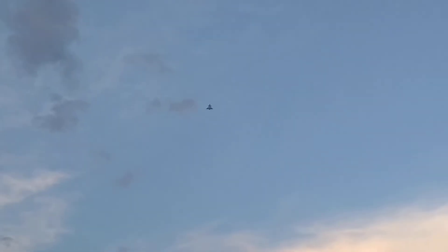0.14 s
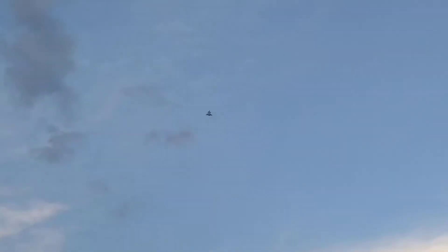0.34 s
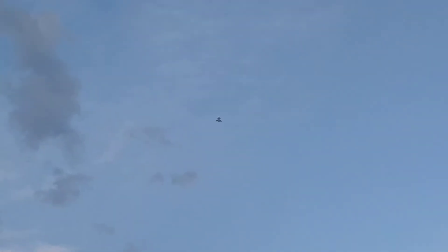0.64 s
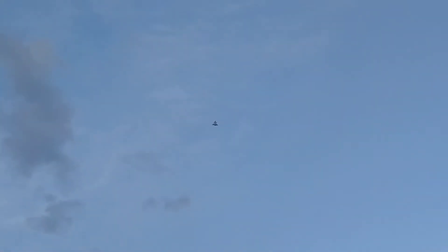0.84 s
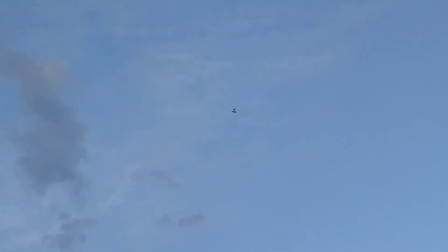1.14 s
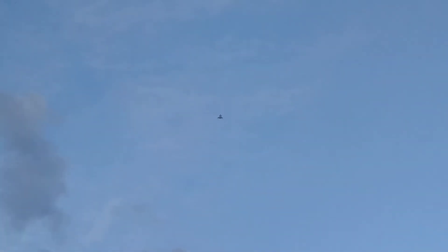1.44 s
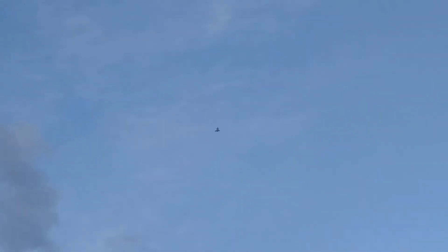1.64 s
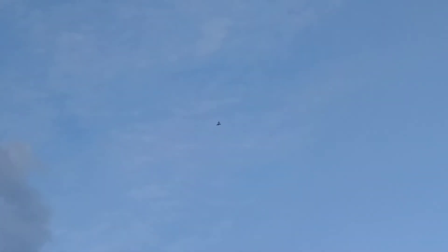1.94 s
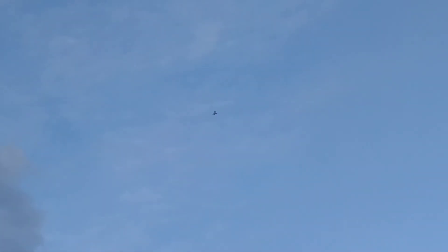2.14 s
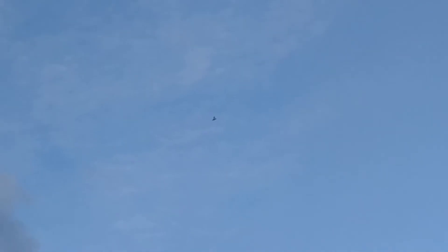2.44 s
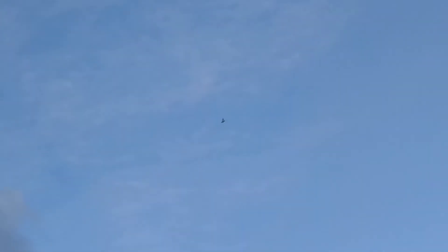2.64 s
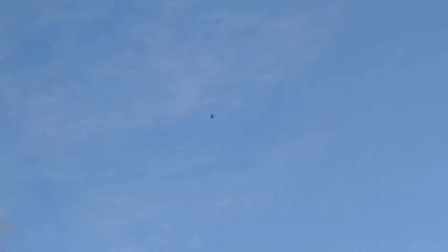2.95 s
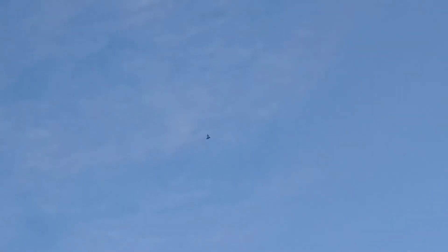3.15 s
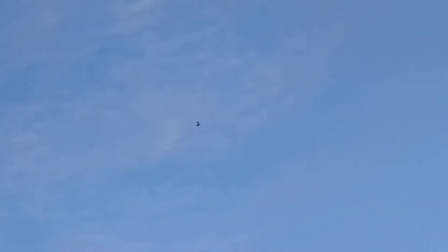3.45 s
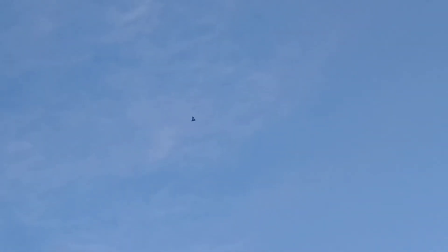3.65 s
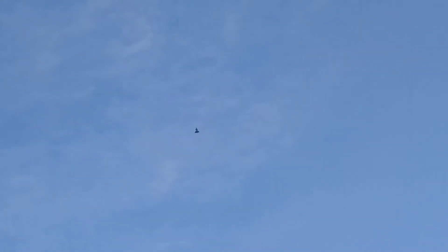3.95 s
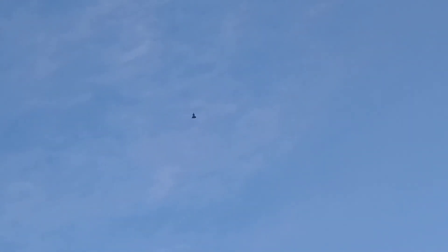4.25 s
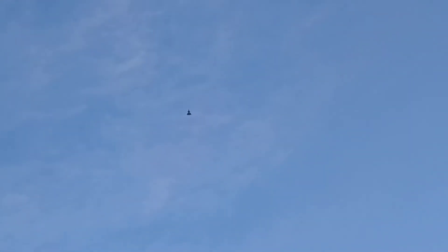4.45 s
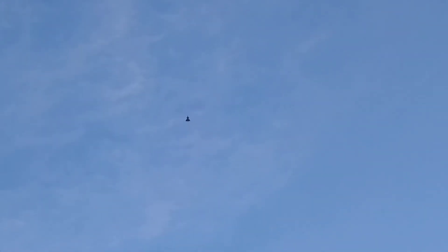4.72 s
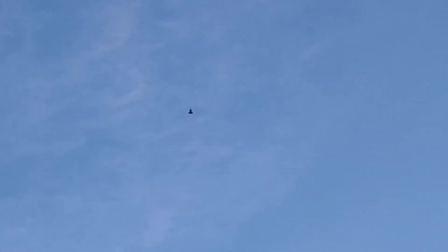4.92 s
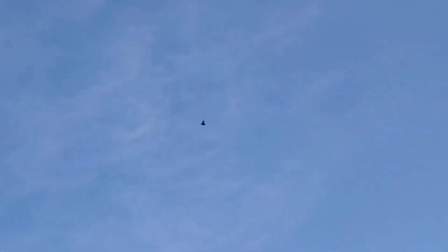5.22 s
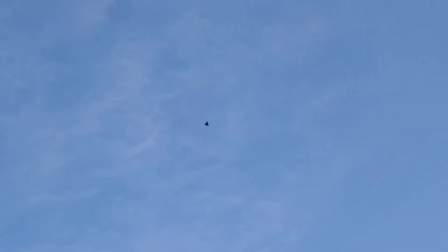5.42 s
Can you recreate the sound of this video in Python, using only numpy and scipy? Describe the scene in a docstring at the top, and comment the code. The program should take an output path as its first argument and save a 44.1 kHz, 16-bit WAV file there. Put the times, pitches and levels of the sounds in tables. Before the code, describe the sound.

A distant model jet holds a continuous electric whine: a clear hum, a fluttering whistle far above it, and rushing, sizzling air. The hum weakens midway, then returns stronger and slightly higher as the jet turns closer. Soft low wind underlies it in an open field, breaking late into three lumpy gusts that buffet the handheld microphone.

```python
"""At first a model jet with an electric ducted fan hums, whistles and hisses high over a field in a light breeze.
It slowly turns toward the listener: its pitch creeps up, then climbs faster, while the treble fades.
Near the end the freshening breeze breaks into three gusts full of eddies that thump on the microphones.
Wind is shaped noise plus short pressure swings, the airflow is four bands of drifting noise,
and the rotor is a set of fluttering sines at multiples of its shaft rate, with noise around the blade pass."""
import sys
import numpy as np
from scipy import signal
from scipy.fft import rfft, irfft, next_fast_len
from scipy.io import wavfile
from scipy.ndimage import uniform_filter1d, map_coordinates

SR = 44100
rng = np.random.default_rng(int(sys.argv[2]) if len(sys.argv) > 2 else 0)


def wrap_up_sound(samples):
    """Save the sound to the file named by the first command line argument, as 16-bit audio."""
    columns = np.atleast_2d(samples).T
    # keep every value between -1 and 1, then stretch to whole-number steps
    tamed = np.clip(columns, -1, 1)
    steps = np.round(tamed * 32767).astype(np.int16)
    wavfile.write(sys.argv[1], SR, steps)


N = 245981


def amp(db):
    """Decibels to gain."""
    return 10 ** (np.asarray(db) / 20)


def unit(x):
    """Scale to rms 1."""
    return x / np.sqrt(np.mean(x ** 2) + 1e-20)


def along(points, hz):
    """Read (frequency [Hz], value) points on a log frequency axis."""
    f, v = np.transpose(points)
    return np.interp(np.log(hz + 1), np.log(f + 1), v)


def curve(points):
    """Read (time [s], value) points at every sample."""
    s, value = np.transpose(points)
    return np.interp(np.arange(N) / SR, s, value)


def wobble(rate):
    """A smooth random curve with rate knots a second."""
    knots = rng.standard_normal(int(N * rate / SR) + 4)
    return map_coordinates(knots, [np.arange(N) * rate / SR])


def swell(s, width_s, db):
    """A bell-shaped rise or dip of level in dB, centred on s."""
    return db * np.exp(-((np.arange(N) / SR - s) / width_s) ** 2)


def filtered(x, response):
    """Shape the spectrum of x with a complex response of frequency."""
    m = next_fast_len(N + SR // 2)
    return irfft(rfft(x, m) * response(np.fft.rfftfreq(m, 1 / SR)), m)[..., :N]


def patches(shape, bin_count, frame_count):
    """A random field of rms 1, smooth over some frequency bins and time frames."""
    field = uniform_filter1d(rng.standard_normal(shape), size=bin_count, axis=0)
    return unit(uniform_filter1d(field, size=frame_count, axis=1))


EDDIES_PER_S, EDDY_HZ = 12, 100  # how many small eddies, and their middle swing rate
EDDY_DB, EDDY_SPREAD_DB = 1, 9  # middle level over the wind, and the reach either side


def small_eddies(wind_db):
    """Rows (time [s], level [dB], rate [Hz]) of eddies at random times, as strong as the wind of the moment."""
    rows = []
    for when, size, pace in rng.uniform(size=(int(EDDIES_PER_S * N / SR), 3)):
        db = wind_db[int(when * N)] + EDDY_DB + EDDY_SPREAD_DB * (2 * size - 1)
        rows.append((when * N / SR, db, EDDY_HZ * 2 ** (pace - .5)))
    return rows


def puffs(eddies, slowing, cycles):
    """Each eddy is one short swing of pressure at its own rate, with a shape of its own."""
    out = np.zeros(N)
    t = np.arange(N) / SR
    for (s, db, hz), shape in zip(eddies, rng.standard_normal(len(eddies))):
        near = np.abs(t - s) < .05
        u = (t[near] - s) * hz / slowing
        out[near] += amp(db) * np.cos(2 * np.pi * u + np.pi * shape) / np.cosh(u / cycles)
    return out


# spectrum of the wind rumble: (frequency [Hz], relative density [dB per Hz])
RUMBLE_SPECTRUM = [(12, -20), (25, -7), (45, 0), (75, 0), (120, -6), (200, -16), (350, -25), (700, -50)]
# lulls and gusts: (time [s], half-width [s], level over the breeze [dB])
LULLS_AND_GUSTS = [(1.1, 0.57, -5.5), (2.5, .3, 2), (4.35, 0.083, 4), (4.85, 0.088, 4), (5.1, .06, -4),
                   (5.46, 0.18, 6.5)]
# the strongest eddies to strike the microphones: (time [s], nominal level [dB], nominal swing rate [Hz])
STRONG_EDDIES = [(3.13, -28, 149), (3.223, -31, 165), (4.026, -29, 100), (4.313, -30, 85),
                 (4.353, -27.5, 50), (4.382, -25, 100), (4.396, -23, 90), (4.409, -25, 142),
                 (4.479, -29, 95), (4.565, -17.5, 165), (4.582, -27, 95), (4.634, -32, 94),
                 (4.651, -26, 135), (4.802, -32, 135), (4.817, -26, 101), (4.835, -22, 85),
                 (4.848, -29, 131), (4.887, -35, 114), (4.939, -24, 121), (4.96, -28, 89), (5.003, -31, 97),
                 (5.168, -34, 80), (5.199, -29, 73.5), (5.287, -29, 89), (5.302, -32, 140),
                 (5.347, -21, 99), (5.362, -28, 118), (5.404, -24.5, 133), (5.43, -29.5, 92),
                 (5.463, -25, 93), (5.479, -25, 135), (5.504, -17, 119), (5.526, -17, 166)]
BREEZE_DB, FRESHEN_DB_PER_S = -51.5, 1.3  # level at the start, and its steady rise


def wind():
    """Lumpy rumble and puffs push the two channels in opposite directions, the left a little earlier."""
    wind_db = BREEZE_DB + FRESHEN_DB_PER_S * np.arange(N) / SR
    wind_db = wind_db + sum(swell(*gust) for gust in LULLS_AND_GUSTS)
    noise = filtered(rng.standard_normal((2, N)), lambda hz: amp(along(RUMBLE_SPECTRUM, hz)))
    lumpy = noise * amp(6.0 * wobble(22.2))
    rumble, stray = amp(wind_db) * unit(lumpy)
    rows = STRONG_EDDIES + small_eddies(wind_db)
    # every eddy has a sharp core inside a slower, weaker swirl
    core = amp(1.5) * puffs(rows, slowing=.95, cycles=.23)
    swirl = amp(-8) * puffs(rows, slowing=1.8, cycles=.4)
    lead_s = .00043

    def ports(hz):
        half_lead = np.exp(1j * np.pi * hz * lead_s)
        return np.array([1.1 * half_lead, -.9 / half_lead])

    # a little stray rumble pushes both channels the same way
    return filtered(rumble + core + swirl, ports) + amp(-19) * stray


# stereo likeness of the airflow noise: (frequency [Hz], left-right likeness [0-1])
LIKENESS = [(300, .39), (700, .82), (1100, 1), (1280, .97), (1600, .45), (1880, .15), (2120, .998),
            (2540, .998), (2700, .6), (3150, 1), (3700, 1), (4250, .45), (4520, .93), (4900, .55),
            (5650, .95), (6600, .75), (7900, .65), (8600, .3), (9300, .65), (10000, .6), (10700, .25),
            (11800, .35), (13200, .9)]


def rush(spectrum, patchy_db):
    """Turbulent stereo noise of rms 1, with drifting patches of gain."""
    z = signal.stft(rng.standard_normal((2, N)), nperseg=512)[2]
    field = patches(z.shape[1:], bin_count=6, frame_count=14)
    pair = signal.istft(z * amp(patchy_db * field), nperseg=512)[1][:, :N]

    def mid_side(hz):
        turn = np.arccos(np.clip(along(LIKENESS, hz), -1, 1)) / 2
        return amp(along(spectrum, hz)) * np.array([np.cos(turn), np.sin(turn)])

    mid, side = filtered(pair, mid_side)
    return unit(np.array([mid + side, mid - side]))


# treble reaching the listener, used as departures from its mean: (time [s], level [dB])
TREBLE_LEVEL = [(0.0, -49.5), (0.11, -53), (0.19, -48), (0.28, -47.5), (0.38, -51), (0.69, -51.5),
                (0.77, -51.5), (1.78, -54.5), (2.9, -54), (3.43, -55), (3.87, -52), (4.02, -54.5),
                (4.3, -56), (5.3, -61), (5.58, -61)]


def air_level(law):
    """A layer's level in dB: it follows the treble by its own share and drifts as the jet turns."""
    mean_db, share, drift_db_per_s = law
    treble_db = curve(TREBLE_LEVEL)
    t = np.arange(N) / SR
    return mean_db + share * (treble_db - treble_db.mean()) + drift_db_per_s * (t - t.mean())


# spectra of the four air layers: (frequency [Hz], relative density [dB per Hz])
ROAR_SPECTRUM = [(25, -4), (50, 3.5), (80, 4.5), (140, 0.5), (225, -4), (325, 2), (400, -.5), (480, 0.5),
                 (700, 0), (860, 2), (1100, -8.5), (1500, -10.5), (2000, -18), (2500, -45), (3200, -27)]
RUSH_SPECTRUM = [(600, -15), (1050, -4.5), (1500, 1.5), (1650, -1), (1850, -5), (2150, -4.5), (2450, -7),
                 (2750, -6), (3250, -3), (3900, -5.5), (4250, -7), (4500, -5), (4850, -6.5), (6000, -19),
                 (9000, -36)]
INTAKE_SPECTRUM = [(3500, -14.5), (4500, -15.5), (4900, -6.5), (5300, -1), (5700, -1.5), (5950, -1),
                   (6400, 0), (6800, 0), (7200, -2.5), (8200, -9), (10000, -43)]
SIZZLE_SPECTRUM = [(6000, -5.5), (8200, -2), (8800, 1.5), (9300, 4), (9900, -2.5), (10600, -5.5),
                   (11500, -3.5), (12300, -3), (13000, -9), (13400, -2), (14200, -31)]
# base level of each layer: (mean level [dB], share of treble [dB per dB], drift [dB per s])
ROAR_LEVEL = (-50, 0.06, 0.064)
RUSH_LEVEL = (-55, 0.42, -0.83)
HISS_LEVEL = (-56, 1.24, 0)
SIZZLE_LEVEL = (-60.5, 0.96, -0.092)


def airflow():
    """The exhaust roars low and rushes in the middle; the intake hisses high with a fluttering level."""
    flutter_db = 0.66 * wobble(25.11) + .3 * wobble(9)
    # the roar swells as the exhaust points at the listener
    roar_db = air_level(ROAR_LEVEL) + swell(s=1.885, width_s=0.27, db=2.3) + 0.61 * wobble(8)
    # the rush sags just before the jet turns in
    rush_db = air_level(RUSH_LEVEL) + swell(s=2.45, width_s=0.24, db=-1.7) + flutter_db
    hiss_db = air_level(HISS_LEVEL) + flutter_db
    # the hiss brightens in its first swell
    sizzle_db = air_level(SIZZLE_LEVEL) + swell(s=0.25, width_s=0.18, db=2.5)
    sizzle_db = sizzle_db + flutter_db + 0.24 * wobble(11)
    exhaust = amp(roar_db) * rush(ROAR_SPECTRUM, patchy_db=1.0)
    exhaust = exhaust + amp(rush_db) * rush(RUSH_SPECTRUM, patchy_db=1.5)
    hiss = amp(hiss_db) * rush(INTAKE_SPECTRUM, patchy_db=1.5)
    sizzle = amp(sizzle_db) * rush(SIZZLE_SPECTRUM, patchy_db=1.0)
    return exhaust + hiss + sizzle


# phase between the ports, opposed in much of the treble: (frequency [Hz], lead of the left [rad])
PORT_PHASE = [(1800, 0), (1970, 1.9), (2120, 3.05), (2350, 3.14), (2540, 3.08), (2680, 1.4), (2850, .3),
              (3100, 0), (3950, .1), (4200, .8), (4430, 3.3), (4950, 5), (5250, 6.1), (6150, 6.8),
              (6300, 6.6), (6460, 4.5), (7000, 4.8), (7700, 6.2), (8300, 6.8), (8900, 9.5), (9600, 11.7),
              (10300, 12.8), (11100, 15.7), (12000, 18.5), (12450, 19.1), (13200, 22), (13700, 22.1),
              (13950, 25.1)]
# level between the ports: (frequency [Hz], left minus right [dB])
PORT_LEAN = [(350, -2.5), (1100, -.5), (1600, -1.5), (2000, 1), (2150, 0), (3900, 0), (4370, 2.5),
             (4650, 0), (5100, -3), (5800, 0), (6450, 9), (6600, 6), (6780, 0), (7250, -3), (8100, 0),
             (8700, 4), (10000, .5), (12200, .5), (12900, 3), (13300, 0)]


def microphones(x):
    """The two ports hear the distant jet with their own phase and level at each frequency."""
    def response(hz):
        lean = amp(along(PORT_LEAN, hz))
        lead = np.exp(.5j * along(PORT_PHASE, hz))
        return np.array([lean * lead, 1 / lead]) / np.sqrt((1 + lean ** 2) / 2)
    return filtered(x, response)


WAVER_RAD, WAVER_SETTLE_DB_PER_S = 0.8, 3.2  # how far the phase strays at first, and how it settles


def waver(pair):
    """Where the two ports nearly cancel, their phase strays, so the notches in the hiss shift and fill."""
    hz, s, z = signal.stft(pair, SR, nperseg=512)
    opposed = np.sin(along(PORT_PHASE, hz) / 2) ** 4
    reach = WAVER_RAD * amp(-WAVER_SETTLE_DB_PER_S * s) * opposed[:, None]
    stray = reach * patches(z.shape[1:], bin_count=3, frame_count=12)
    turned = z * np.exp(.5j * np.array([stray, -stray]))
    return signal.istft(turned, SR, nperseg=512)[1][:, :N]


def partial(angle, twinkle_db, smear, rate):
    """A tone of rms 1 whose level and phase flutter on the way through moving air."""
    return unit(amp(twinkle_db * wobble(rate)) * np.sin(angle + smear * wobble(rate)))


# an overtone swells or drops out as a lobe or gap of its beam sweeps past:
# (multiple of the shaft rate, time [s], half-width [s], level change [dB])
BEAM_LOBES = [(2, 0.39, 0.18, 8), (2, 0.85, 0.13, -9), (2, 1.2, 0.36, 2.5), (2, 3.7, 0.23, -11),
              (2, 4.81, 0.16, -15), (2, 5.53, 0.33, 8.5), (3, 1.3, 0.39, 6), (3, 3.49, 0.29, 11.5),
              (3, 4.08, 0.26, 12), (3, 3.4, 0.13, -6.5), (11, .3, 0.81, 2), (11, 3, 0.79, -1),
              (13, .4, 0.62, -15), (13, 4.55, 0.65, 9.5), (24, 0.27, .45, 12), (24, 2.9, .6, 3)]


def lobes(multiple):
    """The swells and gaps of one overtone, in dB."""
    return sum(swell(s, width_s, db) for k, s, width_s, db in BEAM_LOBES if round(k) == multiple)


# the once-a-turn hum, before a small trim: (time [s], level [dB])
HUM_LEVEL = [(0.0, -38), (0.51, -41), (1.33, -38.5), (1.89, -41.5), (2.59, -48), (3.71, -33.5), (4.35, -32),
             (4.43, -34.5), (5.1, -35), (5.5, -40), (5.58, -43.5)]
SECOND_DB, THIRD_DB = -63.5, -71.5  # shaft overtones outside their lobes
HUM_PAN_DB = 3  # left minus right


def shaft_hum(angle):
    """The rotor hums once a turn, with two weak overtones, leaning to the left."""
    hum = amp(curve(HUM_LEVEL) - 0.24) * partial(angle, twinkle_db=0.27, smear=0.018, rate=40)
    # a weak scattered copy beats against the hum, most clearly where the hum is faint
    scattered = amp(-61) * partial(angle, twinkle_db=2, smear=2.5, rate=30)
    second = amp(SECOND_DB + lobes(2)) * partial(2 * angle, twinkle_db=2.3, smear=.45, rate=22)
    third = amp(THIRD_DB + lobes(3)) * partial(3 * angle, twinkle_db=1.2, smear=.25, rate=18)
    return (hum + scattered + second + third) * amp([[HUM_PAN_DB / 2], [-HUM_PAN_DB / 2]])


# reference level for the blade-pass whistle and its company: (time [s], level [dB])
WHISTLE_LEVEL = [(0, -56), (.15, -58), (.26, -53), (.43, -57), (.65, -53), (.8, -59.5), (1.1, -57),
                 (1.6, -56.5), (2.1, -57.5), (2.28, -54), (2.65, -56.5), (2.92, -55.5), (3.3, -61.5),
                 (3.65, -61), (3.85, -56), (4.02, -67), (4.35, -57.5), (4.6, -64.5), (4.82, -59),
                 (5.2, -70.5), (5.58, -69)]
# faint shaft orders: (multiple of the shaft rate, level re the whistle reference [dB])
FAINT_ORDERS = [(5, -17), (6, -14)]
BLADES = 12
OCTAVE_DB, HAZE_DB = -20, -4.5  # relative to the whistle reference
SIDEBAND_DB = -15  # relative to the base level of the intake hiss
HAZE_WIDTH_HZ = 160  # half-width of the hiss around the blade pass


def blade_whistle(angle):
    """Twelve blades whistle at the blade pass; slightly unequal blades put sidebands beside it."""
    blade_db = curve(WHISTLE_LEVEL)
    sideband_db = air_level(HISS_LEVEL) + SIDEBAND_DB
    pass_angle = BLADES * angle
    whistle = amp(blade_db + 1.6) * partial(pass_angle, twinkle_db=1.5, smear=.3, rate=32)
    # turbulence swallowed by the fan spreads a narrow skirt around the blade pass
    skirt = amp(blade_db - 11) * partial(pass_angle, twinkle_db=3, smear=2.2, rate=260)
    # larger eddies spread a wider haze that climbs with the whistle
    churn = filtered(rng.standard_normal((2, N)), lambda hz: 1 / (1 + (hz / HAZE_WIDTH_HZ) ** 4))
    carried = churn[0] * np.cos(pass_angle) + churn[1] * np.sin(pass_angle)
    haze = amp(blade_db + HAZE_DB) * unit(carried)
    octave_db = blade_db + OCTAVE_DB + lobes(2 * BLADES)
    octave = amp(octave_db) * partial(2 * pass_angle, twinkle_db=3, smear=1.6, rate=140)
    out = whistle + skirt + haze + octave
    for k in (BLADES + 1, BLADES - 1):
        out = out + amp(sideband_db + lobes(k)) * partial(k * angle, twinkle_db=1.6, smear=.6, rate=50)
    for k, db in FAINT_ORDERS:
        out = out + amp(blade_db + db) * partial(round(k) * angle, twinkle_db=4.0, smear=0.57, rate=25)
    return out


# shaft rate as heard, Doppler shift included; it climbs faster once the jet turns in: (time [s], rate [Hz])
SHAFT_RATE = [(0, 540.3), (.4, 542.2), (.85, 543.8), (1.4, 546.3), (2.6, 549.7), (3.1, 551.6), (3.6, 555.6),
              (5.1, 570.4), (5.58, 576)]


def rotor():
    """One turning angle drives every tone, so hum and whistle keep whole multiples of the shaft rate."""
    angle = 2 * np.pi * np.cumsum(curve(SHAFT_RATE)) / SR + .04 * wobble(14)
    return shaft_hum(angle) + blade_whistle(angle)


def scene():
    """The wind at the microphones and the jet overhead."""
    return wind() + waver(microphones(airflow())) + microphones(rotor())


TOP_HZ = 14200


def record(dry):
    """Cut the deepest rumble and keep nothing above the band limit."""
    low_cut = signal.butter(2, 42, "highpass", fs=SR, output="sos")
    return filtered(signal.sosfilt(low_cut, dry), lambda hz: hz < TOP_HZ)


dry = scene()
out = record(dry)
wrap_up_sound(out)
```